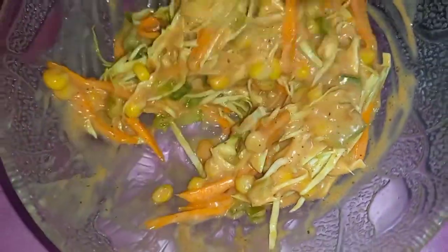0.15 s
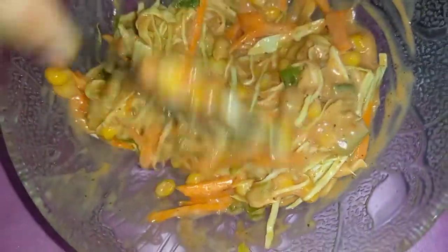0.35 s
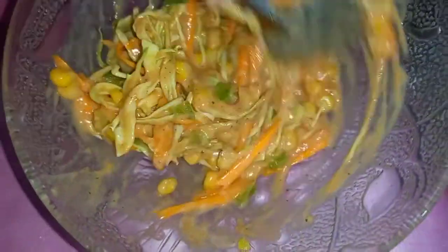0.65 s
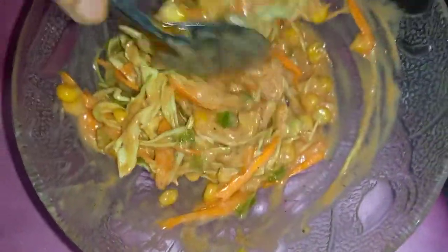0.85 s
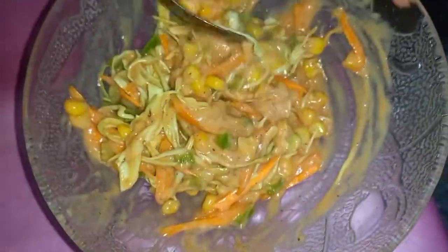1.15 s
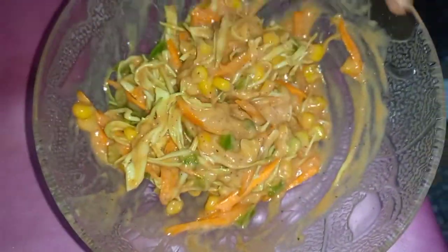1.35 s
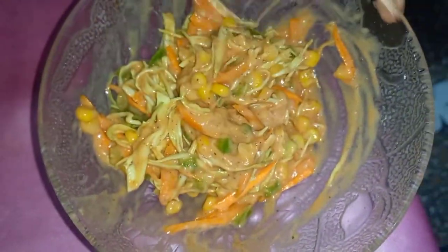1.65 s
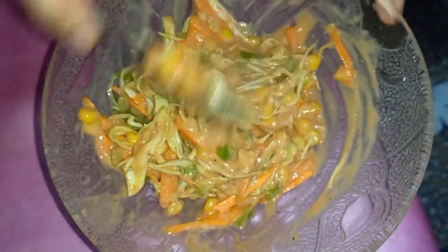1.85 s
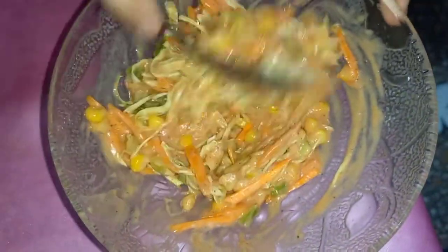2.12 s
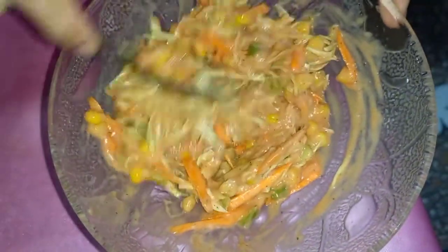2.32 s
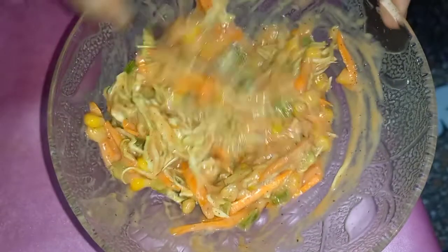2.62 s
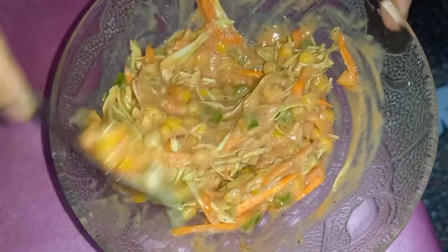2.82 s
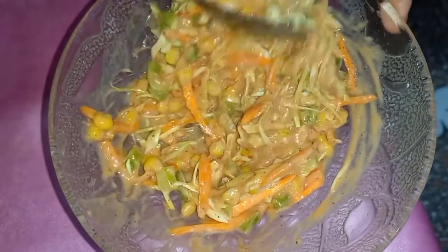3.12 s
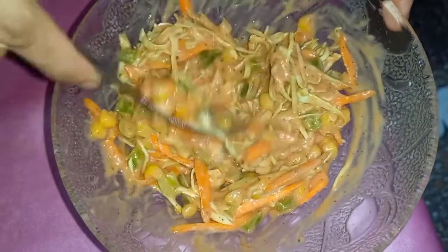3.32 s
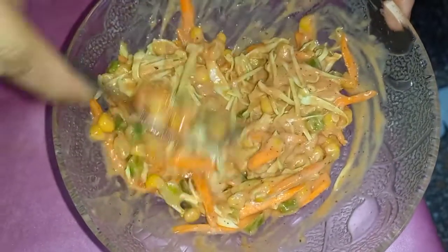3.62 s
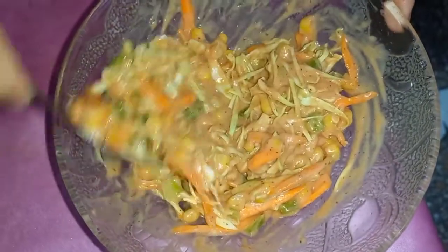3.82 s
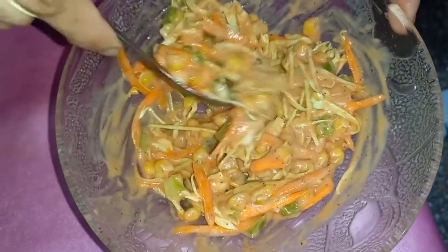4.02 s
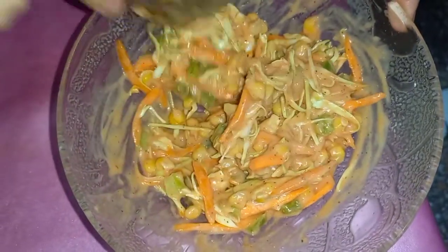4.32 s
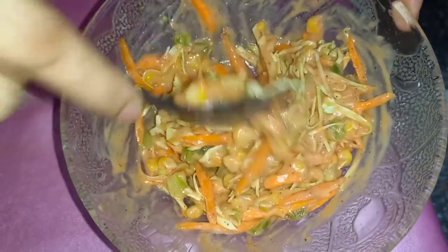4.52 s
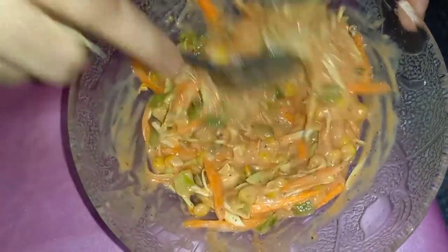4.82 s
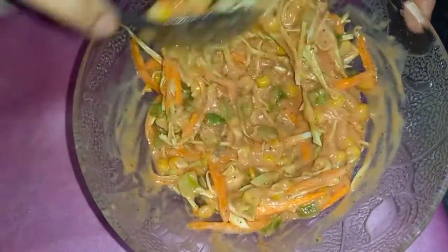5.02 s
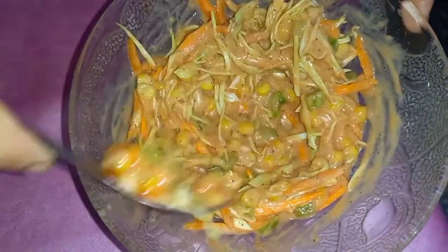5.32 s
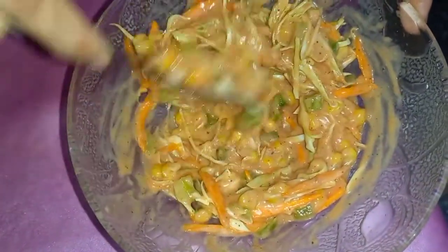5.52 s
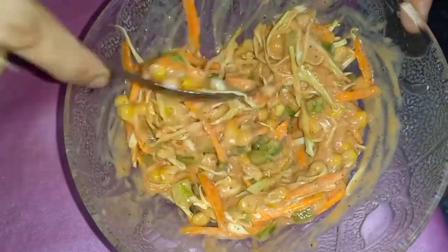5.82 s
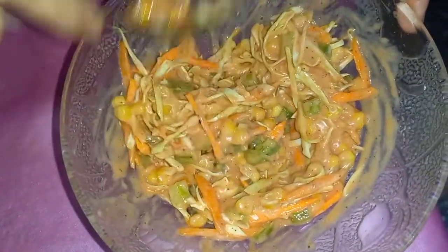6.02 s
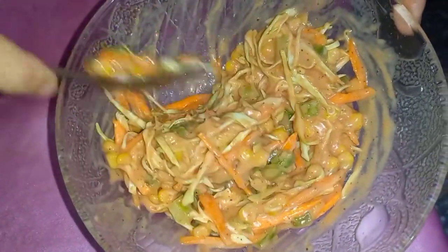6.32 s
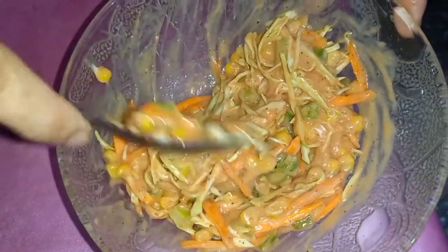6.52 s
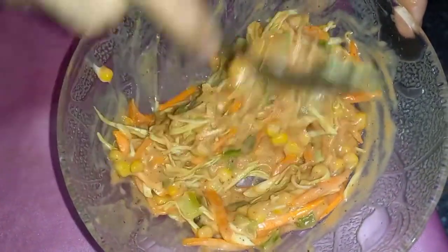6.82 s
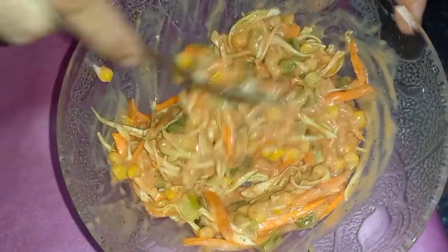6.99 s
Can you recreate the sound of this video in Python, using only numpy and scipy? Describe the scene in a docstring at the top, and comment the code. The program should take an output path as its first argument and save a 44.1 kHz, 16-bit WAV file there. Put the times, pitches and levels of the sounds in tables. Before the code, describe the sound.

In a small kitchen, close microphones hear a steel spoon folding wet, dressed salad in a glass bowl. A low hum with gliding, engine-like tones, rumble and slightly hollow hiss runs throughout, swelling and wavering. A faint tap and dull knock come at 0.5 s, then a wet scraping stroke with sticky ticks around 0.9 s and a loud, bright glass clink at 1.0 s. Another sharp, drier clink lands at 1.67 s. From 2 to 4 s small strokes crackle and rustle softly, with a very faint thin squeak near 2.45 s and a muffled knock near 3 s. A more modest clink sounds at 4.3 s. Dull knocks at 4.9 and 5.25 s lead into busier wet scraping and snapping until about 5.8 s. A strong clink rings briefly at 6.0 s; a last light scrape and tiny squeak follow near 6.7 s before the hum carries on to 7 s.

```python
"""A small kitchen, with the microphones close to a hand-held glass bowl of dressed salad.
A steel spoon folds the salad and clinks on the glass: noise cracks with decaying sines for the bowl's
modes, which the food damps quickly and the kitchen carries on. Wet shreds tick, crackle and scrape in
short noise bursts under the strokes, with dull knocks and thin squeaks. Behind lie the low wavering
hum and hiss of a fan or motor, made of wandering sines and coloured noise."""
import sys
import numpy as np
from scipy import signal
from scipy.fft import rfft, irfft, next_fast_len
from scipy.io import wavfile
from scipy.ndimage import uniform_filter1d, map_coordinates

SR = 44100
rng = np.random.default_rng(int(sys.argv[2]) if len(sys.argv) > 2 else 0)


def waveform_to_disk(signal):
    """Save audio, clipped to [-1, 1], as 16-bit WAV at the path in sys.argv[1]."""
    frames = np.transpose(np.atleast_2d(signal))
    scaled = np.clip(frames, -1, 1) * 32767
    samples = np.round(scaled).astype(np.int16)
    wavfile.write(sys.argv[1], SR, samples)


N = 315315  # length in samples


def amp(db):
    """Decibels to gain."""
    return 10 ** (np.asarray(db) / 20)


def unit(x):
    """x at rms 1."""
    return x / np.sqrt(np.mean(x ** 2) + 1e-20)


def along(points, hz):
    """(Hz, value) points read on a log frequency axis."""
    f, v = np.transpose(points)
    return np.interp(np.log(hz + 1), np.log(f + 1), v)


def curves(rows):
    """One value per sample for each column after the time."""
    s, *cols = np.transpose(rows)
    return [np.interp(np.arange(N) / SR, s, c) for c in cols]


def wobble(rate, count=N):
    """A smooth random curve, rate knots a second."""
    knots = rng.standard_normal(int(count * rate / SR) + 4)
    return map_coordinates(knots, [np.arange(count) * rate / SR])


def bell(s, half_length):
    """A rounded rise and fall around time s, peak 1."""
    return np.exp(-((np.arange(N) / SR - s) / half_length) ** 2)


def fade(t, t60):
    """Free decay, 60 dB down after t60 seconds."""
    return np.exp(-np.log(1000) * t / t60)


def tone(hz):
    """A sine of rms 1 that follows a pitch curve from a random phase."""
    cycles = np.cumsum(hz) / SR + rng.random()
    return np.sqrt(2) * np.sin(2 * np.pi * cycles)


def filtered(x, response):
    """x times a response of frequency."""
    n = x.shape[-1]
    m = next_fast_len(n + SR // 10)  # padded so that the end does not wrap onto the start
    hz = np.fft.rfftfreq(m, 1 / SR)
    return irfft(rfft(x, m) * response(hz), m)[..., :n]


def add(track, s, sound):
    """Mix a stereo sound into the track at time s."""
    part = track[:, round(s * SR):][:, :sound.shape[-1]]
    part += sound[:, :part.shape[-1]]


# How alike the two microphones hear wide noise.
# Each row: frequency in Hz, left-right likeness from -1 to 1.
LIKENESS = [(30, 0.81), (70, 1), (130, 0.72), (300, 0.9), (550, 0.44), (900, -0.16), (2500, 0.059),
            (15000, -0.16)]


def rush(level_db):
    """Stereo noise of rms 1 with the given spectrum, near mono in the bass."""
    def mid_side(hz):
        turn = np.arccos(np.clip(along(LIKENESS, hz), -1, 1)) / 2
        return amp(level_db(hz)) * np.array([np.cos(turn), np.sin(turn)])

    mid, side = filtered(rng.standard_normal((2, N)), mid_side)
    return unit(np.array([mid + side, mid - side]))


# How long the kitchen holds each pitch. Each row: frequency in Hz, t60 in seconds.
KITCHEN_T60 = [(300, 0.11), (2000, 0.15), (7000, 0.2), (14000, 0.16)]


def in_kitchen(x, room_db):
    """x followed by the short answer of the walls, decaying noise which favours no pitch."""
    hz, t, z = signal.stft(rng.standard_normal((2, SR // 3)), SR, nperseg=256)
    decay = fade(t, along(KITCHEN_T60, hz)[:, None])
    build_up = 1 - np.exp(-t / 0.0068)
    tail = signal.istft(z * decay * build_up, SR, nperseg=256)[1]
    # level the spectrum in bands 70 Hz wide
    answer = rfft(tail, SR)
    band_power = uniform_filter1d(np.abs(answer) ** 2, size=70)
    tail = irfft(answer / np.sqrt(band_power), SR)[:, :SR // 3]
    tail /= np.linalg.norm(tail[0])
    return x + amp(room_db) * signal.fftconvolve(x, tail, axes=1)[:, :x.shape[-1]]


# Slow swell shared by the rumble and the rustle, before each widens its swings and sets its level.
# Each row: time in seconds, level in dB.
SWELL_LEVEL = [(0.4, -46.5), (0.93, -41), (1.15, -44.5), (1.45, -44), (1.9, -45.5), (2.3, -45.5),
               (2.68, -48.5), (3.15, -45), (3.5, -47.5), (5.25, -41), (5.95, -40.5), (6.08, -45.5),
               (6.6, -44.5)]


def follow(grows):
    """The slow swell in dB, its swings around the mean multiplied by the factor grows."""
    swell_db, = curves(SWELL_LEVEL)
    return swell_db.mean() + grows * (swell_db - swell_db.mean())


# Spectrum of the low rumble. Each row: frequency in Hz, relative level in dB per Hz.
RUMBLE_SPECTRUM = [(25, -30), (55, -16), (72, -2.5), (100, 5.5), (180, 4), (210, -6), (245, 4), (345, 0),
                   (410, -7.5), (530, -8), (620, -16), (850, -16), (1000, -25), (2500, -38.5)]
# Spectrum of the hiss under its resonances. Each row: frequency in Hz, relative level in dB per Hz.
HISS_SPECTRUM = [(200, -11.5), (1000, 20.5), (1350, 7.5), (1800, 14), (2400, 8), (3200, -4), (4400, -3.5),
                 (7000, -11), (8500, -0.5), (10300, -2), (12000, 1), (15600, -16), (16000, -38)]
# Resonances in the hiss. Each row: centre in Hz, width in Hz, height in dB.
HISS_RESONANCES = [(885, 220, -25), (1970, 235, 6), (3850, 450, 10.5), (5135, 128, 18), (8530, 490, 11.5)]
LEFT_LAG_S = 0.000446  # the direct sound of the fan reaches the left microphone later


def hiss_colour(hz):
    """Spectrum of the hiss in dB: a broad slope with resonant peaks that make it slightly hollow."""
    peaks = sum(db / (1 + (2 * (hz - centre) / width) ** 2) for centre, width, db in HISS_RESONANCES)
    return along(HISS_SPECTRUM, hz) + peaks


def air(rumble_db=4, hiss_db=-59, direct_db=-5):
    """Moving air: a slowly swelling rumble and a steady hiss, partly heard straight from the fan."""
    rumble = rush(lambda hz: along(RUMBLE_SPECTRUM, hz))
    rumble = amp(follow(grows=0.73) + rumble_db) * rumble
    lags = LEFT_LAG_S * np.array([[1], [0]])
    direct = filtered(rush(hiss_colour)[0], lambda hz: np.exp(-2j * np.pi * hz * lags))
    return rumble + amp(hiss_db) * (rush(hiss_colour) + amp(direct_db) * direct)


# Slow level of the hum, before hum_db, surges and flutter. Each row: time in seconds, level in dB.
HUM_LEVEL = [(1.4, -48.5), (2.28, -37), (2.65, -58), (2.92, -38.5), (3.4, -44), (5.4, -37.5), (6.3, -41.5)]
# Brief swells of the hum. Each row: middle in seconds, rise in dB.
HUM_SURGES = [(0.43, 11), (1.66, 10.5), (1.9, 8), (3.63, 8), (3.95, 12), (4.33, 3), (4.53, 4), (4.77, 5.5),
              (5.13, 5.5), (5.92, 14.5), (6.84, 10)]
SURGE_HALF_S = 0.06


def hum(hum_hz=128, waver_hz=5, hum_db=-1, flutter_db=3):
    """An unsteady low sine whose pitch wavers; it slowly rises and falls, and surges now and then."""
    slow_db, = curves(HUM_LEVEL)
    surge_db = sum(db * bell(s, SURGE_HALF_S) for s, db in HUM_SURGES)
    level_db = slow_db + hum_db + surge_db + flutter_db * wobble(22)
    return amp(level_db) * tone(hum_hz + waver_hz * wobble(20))


# Low tones that come and go, gliding like distant engines, before flutter and waver.
# Each row: start in seconds, end in seconds, first pitch in Hz, last pitch in Hz, level in dB.
DRONE_GLIDES = [(-0.15, 0.47, 194, 172, -48), (0.5, 1.14, 157, 170.7, -42), (1.25, 2.1, 172, 191, -44),
                (1.201, 1.89, 334, 303.2, -50.5), (1.78, 2.27, 151, 164.5, -40),
                (2.45, 6.65, 158, 155.3, -49), (6.618, 6.97, 153, 169.3, -38)]
DRONE_FADE_S = 0.14


def drones(waver_hz=2, flutter_db=2.0):
    """Low sines that fade in, glide in pitch with a slight waver and fade out."""
    t, out = np.arange(N) / SR, np.zeros(N)
    for start, end, first_hz, last_hz, db in DRONE_GLIDES:
        present = np.clip(np.minimum(t - start, end - t) / DRONE_FADE_S, 0, 1)
        hz = np.interp(t, [start, end], [first_hz, last_hz]) + waver_hz * wobble(18)
        out += present * amp(db + flutter_db * wobble(13)) * tone(hz)
    return out


# Faint, blurred motor tones. Each row: pitch in Hz, width in Hz, level in dB.
MOTOR_TONES = [(846.6, 25.5, -63), (1703, 5.9, -65), (1979, 19, -66)]


def whine():
    """The motor's faint tones, each a narrow band of noise."""
    out = np.zeros((2, N))
    for hz, width, db in MOTOR_TONES:
        out += amp(db) * rush(lambda f: -20 * np.log10(1 + ((f - hz) / width) ** 2))
    return out


def snap(hz, t60, octaves=0.29):
    """A film of dressing breaks: a few milliseconds of noise around one pitch, peak 1."""
    t = np.arange(SR // 40) / SR
    noise = rng.standard_normal((2, len(t)))
    band = filtered(noise, lambda f: 1 / (1 + (np.log2((f + 1) / hz) / octaves) ** 2))
    burst = band * fade(t, t60) * (1 - np.exp(-t / 0.00016))
    return burst / np.abs(burst).max()


# The loudest films of dressing snapping, close to the microphones.
# Each row: start in seconds, peak in dB before tick_db and the room, pitch in Hz.
FILM_SNAPS = [(0.599, -46.5, 3100), (0.8305, -48, 8640), (0.8609, -46, 5150), (0.8737, -41, 8500),
              (0.9133, -44, 14000), (2.05, -45, 8700), (2.065, -49, 5060), (2.155, -41.5, 12300),
              (2.27, -38, 15300), (2.749, -40.5, 8550), (2.997, -44, 3900), (3.208, -47, 4350),
              (3.573, -39.5, 8950), (3.625, -39.5, 10800), (4.737, -43, 3350), (5.1604, -40.5, 8850),
              (5.199, -41.5, 2600), (5.373, -44, 13500), (5.435, -38.5, 8360), (5.467, -41, 3840),
              (5.478, -37, 14500), (6.346, -41.5, 11300), (6.505, -44, 12700)]
# The fine crackle: weakest snap, range above it, and density between strokes (1 at a stroke's peak).
CRACKLE_DB, CRACKLE_SPREAD_DB, IDLE_SHARE = -53, 12, .08


def salad(tick_db=4.5, rustle_db=-31, count=200):
    """Single wet ticks over a fine crackle that gathers in the strokes, and a soft noise rustle."""
    out = np.zeros((2, N))
    for s, db, hz in FILM_SNAPS:
        add(out, s, amp(db + tick_db) * snap(hz, t60=.011, octaves=.35))
    # most films break under the spoon
    density = IDLE_SHARE + sum(bell(s, length) for s, length, *_ in SPOON_STROKES)
    effort = np.cumsum(density)
    for when, pitch, size in rng.random((count, 3)):
        s = np.searchsorted(effort, when * effort[-1]) / SR
        hz = 7000 + 8000 * pitch
        snap_db = CRACKLE_DB + CRACKLE_SPREAD_DB * size ** 3  # strong snaps are rare
        add(out, s, amp(snap_db) * snap(hz, t60=.008))
    ticks = in_kitchen(out, room_db=-11)
    # each pair: frequency in Hz, relative level in dB per Hz
    rustle_spectrum = [(400, -15.0), (1100, 22), (3000, 8), (7000, -16.0), (9000, 0.0),
                       (13000, -4.0), (16000, -26.0)]
    rustle = rush(lambda hz: along(rustle_spectrum, hz))
    level_db = follow(grows=4.5) + rustle_db + 2.0 * wobble(18)
    return ticks + amp(level_db) * rustle


# The loaded glass bowl, nine main modes and then the minor ones.
# Each row: pitch in Hz, t60 in seconds before the sustain factor.
BOWL_MODES = [(1590, .05), (1895, .035), (2700, .12), (4040, .05), (5555, .06), (7275, .06), (9190, .04),
              (11295, .055), (13610, .04), (1750, .025), (2330, .025), (4170, .028), (4400, .02),
              (5250, .025), (8330, .025), (10000, .04), (10550, .025), (12240, .03), (14200, .025)]
# How strongly the main modes speak on average: one level in dB for each.
MAIN_MODE_DB = [-11.5, 3, -6.5, 0, 0.8, 4, 4, 4.7, -1.5]
NODE_DB = 5.5  # a mode gains this much when struck on a crest and loses as much near a node


def bowl_modes(ring_db, tilt_db, place):
    """Main mode levels in dB for one contact: bending waves shorten as root Hz, so nodes differ."""
    hz = np.array(BOWL_MODES)[:len(MAIN_MODE_DB), 0]
    crest = np.cos(2 * np.pi * place * np.sqrt(hz / 1000))
    octaves = np.log2(hz / 4000)
    return np.array(MAIN_MODE_DB) + ring_db + tilt_db * octaves + NODE_DB * crest


# Spoon on glass, close to the microphones.
# Each row: start in seconds, level of the first 5 ms in dB before the room, brightness of the crack in
# dB per octave, room in dB, ring in dB, brightness of the ring in dB per octave, place on the wall in
# bending wavelengths at 1 kHz, t60 of the crack in seconds.
SPOON_CLINKS = [(0.502, -29, 5, -11.5, -13, 0, 3.55, 0.01), (1.0060, -10, -1.5, -11, 3, -1.1, 3.96, 0.014),
                (1.6657, -10, 1.8, -9.5, -5.8, 3.7, 2.455, 0.009),
                (1.724, -36, -6, -16, -10, -4, 3.58, .012),
                (4.3213, -22.5, -1, -12.5, -3.5, -2.4, 3.87, 0.012),
                (5.9826, -12.5, 2, -6.5, 2, 0, 3.8, 0.012)]
# Spectrum of the contact itself, before its brightness. Each row: frequency in Hz, relative dB per Hz.
CRACK_SPECTRUM = [(300, -12), (1000, -9), (1300, -8.5), (1650, 3.5), (2350, 7.5), (3100, 4), (4400, 3),
                  (6400, -4.5), (8500, 9), (12000, 1), (14200, -0.5), (16000, -12)]
# Each main mode radiates towards one side: left minus right in dB, one value for each.
MAIN_MODE_PAN_DB = [-1.5, 3, 1, -3, 1, -1.5, 2, 3.5, -1]


def clinks(crack_db=11, rise_s=0.00054, minor_db=-8, sustain=0.63):
    """Each contact cracks and rings the bowl; where it lands decides which modes speak most."""
    out, t = np.zeros((2, N)), np.arange(SR // 3) / SR
    hz, t60 = np.transpose(BOWL_MODES)[:, :, None]
    minor_count = len(BOWL_MODES) - len(MAIN_MODE_DB)
    pan_db = np.pad(MAIN_MODE_PAN_DB, (0, minor_count))[:, None]
    sides = amp([pan_db / 2, -pan_db / 2])
    for s, db, bright_db, room_db, ring_db, tilt_db, place, crack_t60 in SPOON_CLINKS:
        modes_db = [*bowl_modes(ring_db, tilt_db, place)] + [minor_db] * minor_count
        gain = amp(modes_db)[:, None]
        # the two microphones face different lobes of a mode and hear it a quarter cycle apart
        left = 2 * np.pi * rng.random(hz.shape)
        right = left + np.pi / 2 * rng.choice([-1, 1], hz.shape)
        waves = np.sin(2 * np.pi * hz * t + np.array([left, right]))
        ring = np.sum(sides * gain * fade(t, sustain * t60) * waves, axis=1)
        noise = rng.standard_normal((2, len(t)))
        crack = unit(filtered(noise, lambda f: amp(
            along(CRACK_SPECTRUM, f) + bright_db * np.log2(f / 1000 + 1))))
        hit = ring + amp(crack_db) * crack * fade(t, crack_t60)
        hit = hit * (1 - np.exp(-t / rise_s))
        attack_rms = hit[:, t < .005].std()
        add(out, s, in_kitchen(amp(db) * hit / attack_rms, room_db))
    return out


# Dull knocks. Each row: start in seconds, relative level in dB.
DULL_KNOCKS = [(0.502, -41.5), (0.599, -45.5), (2.975, -42.5), (4.858, -34.5), (5.246, -36.5)]
# Spectrum of a knock. Each row: frequency in Hz, relative level in dB per Hz.
KNOCK_SPECTRUM = [(150, -12), (400, 11.5), (800, 9), (1400, -6), (2200, -3), (4400, -9), (6000, -19.5),
                  (16000, -29)]


def knocks(knock_db=-9.0, t60=0.31, grain_db=4):
    """Dull, cushioned knocks of noise: a soft push and a grainy tail that lingers in the room."""
    out, t = np.zeros((2, N)), np.arange(SR // 3) / SR
    push = 2.8 * fade(t, .04)
    for s, db in DULL_KNOCKS:
        noise = rng.standard_normal((2, len(t)))
        body = filtered(noise, lambda hz: amp(along(KNOCK_SPECTRUM, hz)))
        body = unit(body * amp(grain_db * wobble(320, count=len(t))))
        add(out, s, amp(db + knock_db) * body * (push + fade(t, t60)))
    return in_kitchen(out, room_db=-4)


# The spoon pushes through the shreds, close to the microphones.
# Each row: middle in seconds, half length in seconds, level in dB, brightness in dB per octave.
SPOON_STROKES = [(0.86, .1, -53, -7), (2.042, .06, -57.5, 3), (2.997, .05, -55, -1), (3.224, .06, -58.5, 6),
                 (3.582, .04, -57, 2), (3.892, 0.069, -55, 2.5), (4.489, .05, -55, 2),
                 (5.162, .06, -54.5, 8), (5.293, .04, -53.5, 3), (5.47, .05, -51.5, 3),
                 (5.751, .12, -57.5, 14), (6.719, .05, -56.5, -0.5)]
# Shreds rubbing on steel and glass, before the brightness of the stroke.
# Each row: frequency in Hz, relative level in dB per Hz.
SCRAPE_SPECTRUM = [(200, 6), (600, 16), (1300, -0.5), (2500, 0.5), (4300, -4), (6500, -19), (8500, -8.5),
                   (13000, -27), (16000, -24)]


def scrapes(grain_db=4, grain_rate=700):
    """Each stroke drags the shreds over the glass in a run of tiny slips: noise of uneven level."""
    out, t = np.zeros((2, N)), np.arange(-SR // 4, SR // 4) / SR
    for s, length, db, bright_db in SPOON_STROKES:
        noise = rng.standard_normal((2, len(t)))
        rub = filtered(noise, lambda hz: amp(
            along(SCRAPE_SPECTRUM, hz) + bright_db * np.log2(hz / 1000 + 1)))
        slips = amp(grain_db * wobble(grain_rate, count=len(t)))
        add(out, s + t[0], amp(db) * unit(rub * slips) * np.exp(-(t / length) ** 2))
    return out


# The spoon's edge catching on the glass.
# Each row: middle in seconds, half length in seconds, level in dB before the uneven catching,
# pitch at the middle in Hz before its waver.
EDGE_SQUEAKS = [(2.45, .05, -68, 5980), (6.68, .008, -62, 4950)]
SQUEAK_SAG_HZ_PER_S = 650


def squeak(octave_db=-12, waver=.006, catch_db=5):
    """The spoon's edge sings thinply as it slides on the glass, catching unevenly, sagging in pitch."""
    out, t = np.zeros((2, N)), np.arange(-SR // 10, SR // 10) / SR
    for s, length, db, pitch_hz in EDGE_SQUEAKS:
        hz = pitch_hz * (1 + waver * wobble(250)[:len(t)]) - SQUEAK_SAG_HZ_PER_S * t
        grip = amp(db + catch_db * wobble(82)[:len(t)]) * np.exp(-(t / length) ** 2)
        song = tone(hz) + amp(octave_db) * tone(2 * hz)
        add(out, s + t[0], (grip * song)[None])
    return out


def scene():
    """The bowl close by, the kitchen around it."""
    background = air() + hum() + drones() + whine()
    bowl = salad() + clinks() + knocks() + scrapes() + squeak()
    return background + bowl


TOP_HZ = 16050  # band limit of the recorder


def record(dry):
    """The recorder rounds off peaks near full scale and cuts steeply above its band limit."""
    limited = dry / (1 + np.abs(dry / .92) ** 6) ** (1 / 6)
    return filtered(limited, lambda hz: 1 / np.sqrt(1 + (hz / TOP_HZ) ** 160))


dry = scene()
out = record(dry)
waveform_to_disk(out)
```